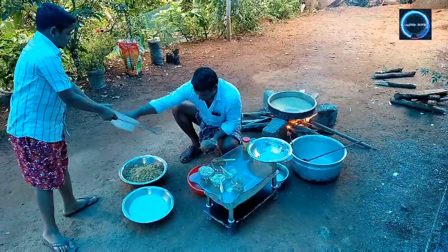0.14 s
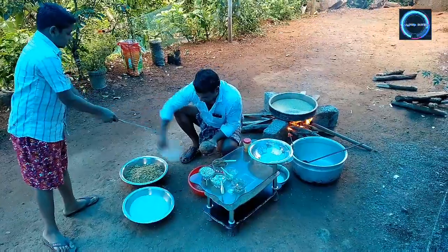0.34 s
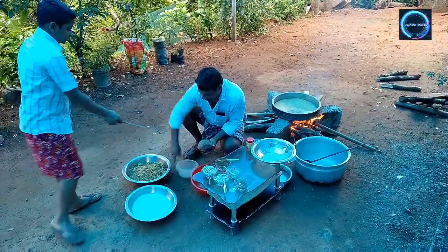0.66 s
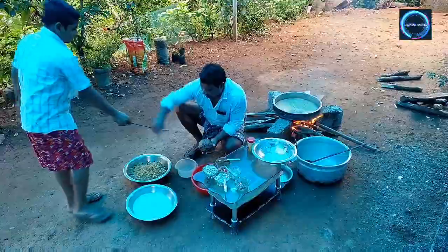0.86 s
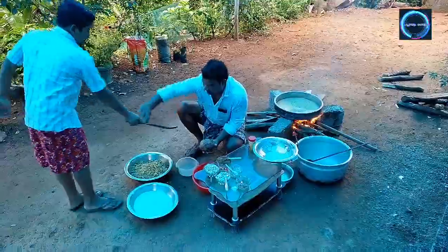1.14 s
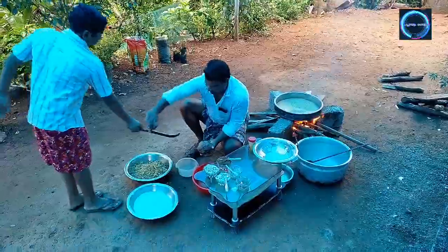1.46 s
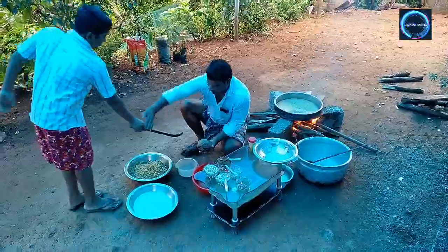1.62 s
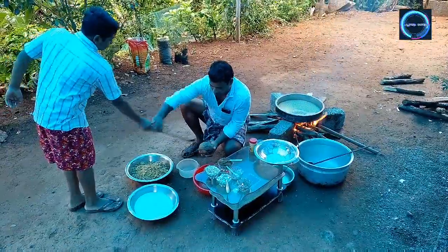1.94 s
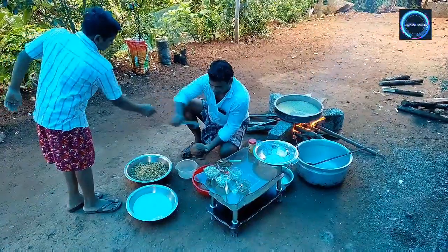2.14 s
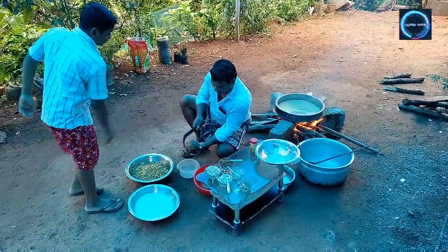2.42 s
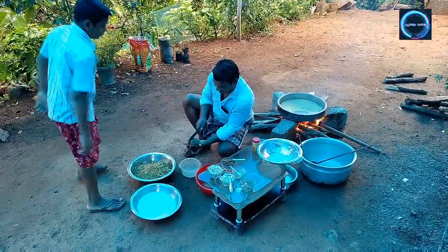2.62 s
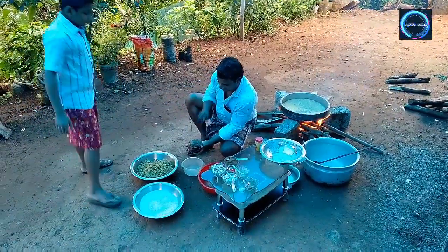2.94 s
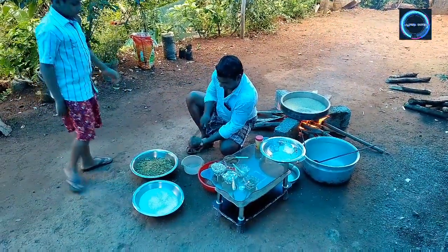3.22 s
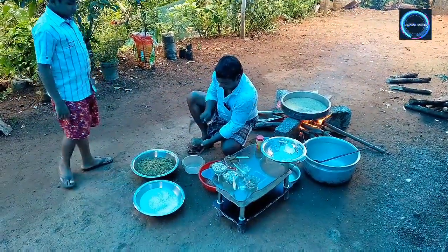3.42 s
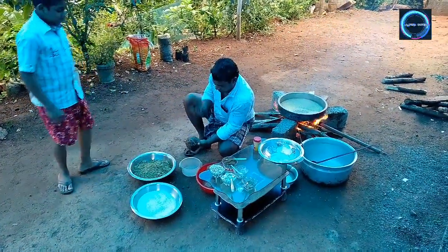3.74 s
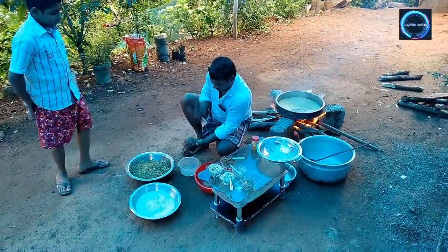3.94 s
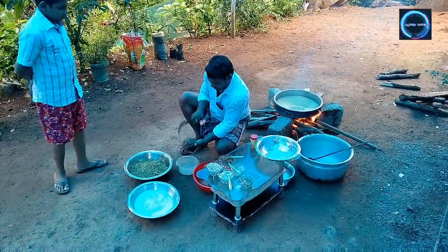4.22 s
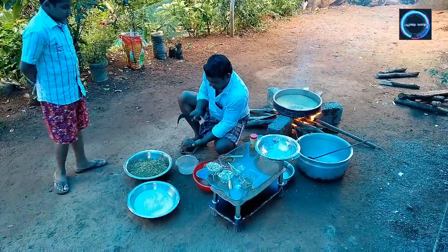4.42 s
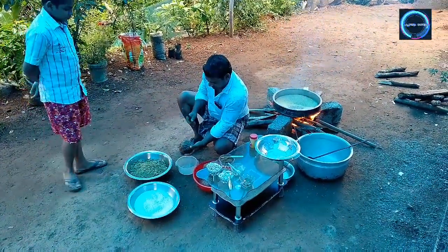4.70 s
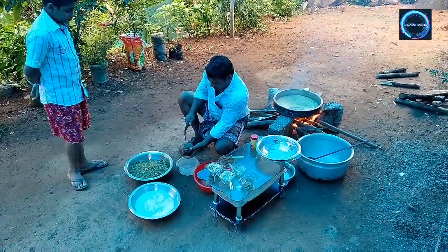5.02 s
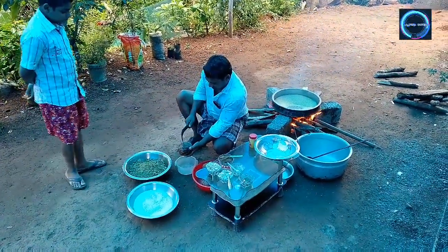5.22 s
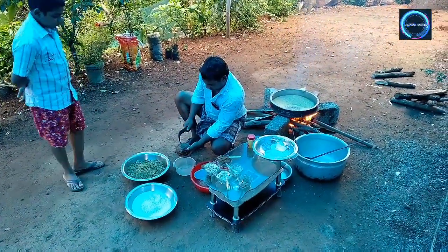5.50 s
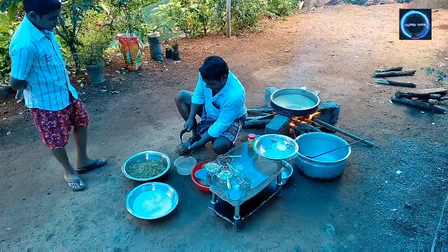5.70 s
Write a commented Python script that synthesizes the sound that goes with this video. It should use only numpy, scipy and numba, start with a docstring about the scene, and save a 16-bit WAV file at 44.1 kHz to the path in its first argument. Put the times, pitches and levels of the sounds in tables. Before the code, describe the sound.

A plastic tub clatters down on an earth yard, then a heavy blade chops a hard coconut shell three times, the last two very loud.

```python
"""A heavy blade chops a hard coconut in an earth yard: a bright crack of the blade, then the knock of the shell.
A plastic tub is set down, things tap, husk and sandals scuff; a fire and garden hiss behind.
Struck things are short pushes into banks of resonances; scuffs and hiss are banded noise.
Walls and trees scatter it all, bar the hiss, into a dense short tail; a phone limits the loud chops."""
import sys
import numpy as np
from scipy import signal
from scipy.io import wavfile
from scipy.ndimage import uniform_filter1d, minimum_filter1d
from numba import njit

SR = 44100
rng = np.random.default_rng(int(sys.argv[2]) if len(sys.argv) > 2 else 0)


def store_wav(level_fs):
    """Save 16-bit WAV to argv[1]."""
    pcm = np.round(np.clip(np.atleast_2d(level_fs), -1, 1) * 32767)
    wavfile.write(sys.argv[1], SR, pcm.T.astype(np.int16))


N = 258426


def undb(db):
    """dB to amplitude."""
    return 10 ** (np.asarray(db) / 20)


def lean(pan_db):
    """Left minus right dB, split evenly over the two channels."""
    return pan_db * np.array([[.5], [-.5]])


def band(x, hz, width_hz):
    """Two-pole resonance, gain 1 at the centre."""
    hz = min(hz, .45 * SR)
    b, a = signal.iirpeak(hz, hz / width_hz, fs=SR)
    return signal.lfilter(b, a, x)


def click():
    """One hard contact: a unit impulse."""
    x = np.zeros(SR // 6)
    x[0] = 1
    return x


def burst(decay_s, rise_s=0.00036):
    """A quarter second that opens with a dying puff of noise."""
    t = np.arange(SR // 4) / SR
    envelope = (1 - np.exp(-t / rise_s)) * np.exp(-t / decay_s)
    return rng.standard_normal(len(t)) * envelope


def ring(push, modes, tilt_db=0., scatter_db=2.0):
    """A push rings the modes in random proportions, tilted in dB/octave from the first; energy is kept."""
    y = 0
    for k, (hz, half_width_hz, db) in enumerate(modes):
        width_hz = 2.0 * half_width_hz
        mode = band(band(push, hz, width_hz), hz, width_hz)
        octaves = np.log2(hz / modes[0][0])
        gain = undb(db + tilt_db * octaves + scatter_db * rng.standard_normal())
        y = y + (-1) ** k * gain * mode / np.linalg.norm(mode)  # neighbours swing in opposite sense
    return y * np.linalg.norm(push) / np.linalg.norm(y)


def detuned(modes, share):
    """Each mode frequency moves at random by this share."""
    return [(hz * (1 + share * rng.standard_normal()), width, db) for hz, width, db in modes]


def add(out, x, s, db, pan_db):
    """Mix one sound into both channels."""
    i = max(int(s * SR), 0)
    out[:, i:i + len(x)] += undb(db + lean(pan_db)) * x[:N - i]


def walk(rate_hz):
    """Random levels held 1 / rate and slewed twice."""
    k = int(SR / rate_hz)
    held = np.repeat(rng.standard_normal(N // k + 1), k)
    return 0.44 * uniform_filter1d(uniform_filter1d(held, k), k)[:N]


ALIKE_HZ = 630  # well below this both ports hear the same
WIND_HZ = 57.7  # below this each port has its own breeze


def pair(n, hz, width_hz):
    """Band noise for two ports, alike in the bass."""
    alike = 1 / (1 + (hz / ALIKE_HZ) ** 2) / (1 + (WIND_HZ / hz) ** 4)
    noise = rng.standard_normal((2, n))
    mid, side = band(band(noise, hz, width_hz), hz, width_hz)
    return np.sqrt(1 + alike) * mid + np.sqrt(1 - alike) * side * np.array([[1], [-1]])


# Fire and garden hiss spectrum: f/Hz, relative level/dB per Hz
HISS = [(18, -60), (30, -99), (58, 7), (122, 7), (231, 0), (306, 0.5), (366, 1), (693, -5), (748, 2),
        (918, -4), (1280, -4), (2080, 0.5), (4000, -4.5), (5000, -20.5), (6300, -7.5), (8910, -6.5),
        (13400, -19.5)]
# Hiss balance: f/Hz, left minus right/dB
HISS_PAN = [(60, 0), (250, 1), (700, -0.5), (2200, 5), (5000, 10), (12000, -0.5)]
HISS_RMS_DB = -50.5  # of the channel mean


def air():
    """Third-octave spaced bands of hiss that swell together and flicker alone."""
    out, swell = 0, walk(2.506)
    (f, level_db), (f_pan, pan_db) = np.transpose(HISS), np.transpose(HISS_PAN)
    for hz in 32 * 2 ** np.arange(0, 8.8, 1 / 3):
        db = np.interp(np.log(hz), np.log(f), level_db) + 5.4 * swell + 2.8 * walk(20)
        band_pan_db = np.interp(np.log(hz), np.log(f_pan), pan_db)
        out = out + undb(db + lean(band_pan_db)) * pair(N, hz, hz / 3)
    return out * undb(HISS_RMS_DB) / np.sqrt(np.mean(out.mean(axis=0) ** 2))


# Scattered tail of the yard: f/Hz, t60/s, level/dB, left minus right/dB
YARD_TAIL = [(56, 0.36, -50.5, 2.5), (249, 0.22, -45.5, 0), (692, 0.26, -45, -0.2),
             (1970, 0.35, -41.5, 2.5), (4900, 0.39, -39.5, 4.5), (9200, 0.32, -36, 0.5)]
YARD_STEADY_S = 0.025  # echoes hold about this long before they fade
YARD_PATCH_DB, YARD_PATCH_HZ = 6, 34.7  # dB per unit of walk, walk rate


def yard(x):
    """Dense echoes: even at first, then dying, each band at its own pace and in its own patches."""
    t, (f, t60s, dbs, pans) = np.arange(SR // 2) / SR, np.transpose(YARD_TAIL)
    late_s = .01 * np.logaddexp(0, (t - YARD_STEADY_S) / .01)  # soft knee
    echo = 0
    for hz in 50 * 2 ** np.arange(0, 8.1, 1 / 3):
        t60, db, pan_db = (np.interp(np.log(hz), np.log(f), v) for v in (t60s, dbs, pans))
        scatter = pair(len(t), hz, hz / 2)
        patches_db = YARD_PATCH_DB * walk(YARD_PATCH_HZ)[:len(t)]
        level_db = db + lean(pan_db) - 60 * late_s / t60 + patches_db
        echo = echo + scatter / scatter.std() * undb(level_db)
    # single walls and trunks stand out, so the echoes come in lumps
    lumps = undb(4.0 * walk(149.0)[:len(t)])
    echo = echo * (1 - np.exp(-t / 0.0013)) * lumps
    return signal.fftconvolve(x, echo, axes=1)[:, :N]


# First single echoes off ground, pots and a wall: delay/s, level/dB, left minus right/dB
FIRST_ECHOES = [(0.0042, -16, 16), (0.0085, -8, -11), (0.016, -10.5, -3), (0.026, -19.5, -10),
                (0.038, -19, -16)]


def early(x):
    """The straight sound and its first separate echoes."""
    out = x.copy()
    for s, db, pan_db in FIRST_ECHOES:
        lag = max(int(s * SR), 1)
        out[:, lag:] += undb(db + lean(pan_db)) * x[:, :-lag]
    return out


# Base level of small handling noises: t/s, level/dB
HANDLING_LEVEL = [(0, -80), (0.3, -59.5), (1.2, -58.5), (1.7, -55), (2.3, -58.5), (3.2, -56.5), (4.55, -68),
                  (4.68, -52), (4.95, -55.5), (5.1, -56), (5.35, -55.5), (5.86, -57.5)]


def handling():
    """Scattered tiny rustles of random pitch and length: puffs through one resonance."""
    out = np.zeros((2, N))
    for at, octave, size, length, side in rng.random((260, 5)):
        s, hz = at * (N - 1) / SR, 1500 * 2 ** (2.8 * octave)
        db = np.interp(s, *np.transpose(HANDLING_LEVEL)) + 6.6 * size
        rustle = ring(burst(0.0038 + 0.02 * length, 0.00055), [(hz, 0.34 * hz, 0)])
        add(out, rustle, s, db, 8.9 * (side - .5))
    return out


# Dull small bumps: t/s, level/dB, f/Hz, left minus right/dB
BUMP_HITS = [(0.272, -52.5, 660, -2), (1.126, -35.5, 507, 3.5), (1.144, -60, 670, -8), (1.717, -49, 256, 2),
             (2.156, -44, 171, -1), (2.946, -37.5, 590, 4.5), (3.069, -53, 545, 4), (3.341, -41.5, 370, 2),
             (3.845, -43.5, 800, 5), (4.621, -49, 196, 0.1), (4.714, -43, 746, -1),
             (4.759, -46.5, 400, 0.1), (4.914, -43, 665, 2), (5.479, -52, 163, 2), (5.69, -46, 127, 0)]
BUMP_DECAY_S, BUMP_RISE_S = 0.015, 0.0011


def bumps():
    """Soft contacts ring one mode and a faint overtone."""
    out = np.zeros((2, N))
    for s, db, hz, pan_db in BUMP_HITS:
        modes = [(hz, 0.3 * hz, 0), (2.5 * hz, hz, -17)]
        add(out, ring(burst(BUMP_DECAY_S, BUMP_RISE_S), modes), s, db, pan_db)
    return out


# Short low thuds on the earth: t/s, level/dB, f/Hz, left minus right/dB
THUD_HITS = [(1.345, -14.5, 307, 0.5), (1.839, -13, 295, 0.5), (5.322, -19, 290, -1)]


def thuds():
    """One blow rings a low mode and two weak overtones."""
    out = np.zeros((2, N))
    for s, db, hz, pan_db in THUD_HITS:
        modes = [(hz, 0.32 * hz, 0), (3.7 * hz, 1.4 * hz, -11), (7.9 * hz, 4.3 * hz, -13)]
        add(out, ring(click(), modes), s, db, pan_db)
    return out


def grains(rows, half_width_share, grit_db):
    """Crackly noise in one band starts fast and dies; grit_db is the mean boost of a grain."""
    out = np.zeros((2, N))
    for s, db, hz, decay_s, pan_db in rows:
        grit = burst(decay_s, rise_s=0.0023) * undb(grit_db * rng.exponential(size=SR // 4))
        add(out, ring(grit, [(hz, half_width_share * hz, 0)]), s, db, pan_db)
    return out


# Scuffs and rustles: t/s, level/dB, f/Hz, decay/s, left minus right/dB
SCUFF_HITS = [(0.0, -40.5, 2420, 0.004, 3), (0.0, -39, 10100, 0.0059, 2), (0.078, -49, 7350, 0.013, 0),
              (1.275, -57, 8000, 0.11, 4), (1.349, -48.5, 4870, 0.011, -3), (1.654, -55, 2130, 0.06, 3.5),
              (1.845, -47.5, 9200, 0.037, 0.5), (1.844, -47, 2260, 0.01, 1), (2.26, -53.5, 5270, 0.01, 12),
              (2.649, -47.5, 9200, 0.025, 6), (3.69, -49, 8800, 0.026, 4), (3.795, -52.5, 11000, 0.024, -4),
              (4.659, -52.5, 8000, 0.3, 0), (4.91, -54.5, 2460, 0.022, 12.5),
              (4.998, -45.5, 6700, 0.0066, -1), (5.135, -46.5, 7600, 0.012, -1),
              (5.322, -52.5, 2880, 0.0086, 11), (5.805, -47, 7760, 0.018, 0)]


def scuffs():
    """Rough rubbing: wide bands of uneven grains."""
    return grains(SCUFF_HITS, half_width_share=0.4, grit_db=3.5)


# Faint pitched rings, among them a high ring of the blade in the first chop: t/s, level/dB, f/Hz, decay/s, left
# minus right/dB
RING_HITS = [(0.817, -25, 2780, 0.0027, 9), (2.773, -28.5, 5870, 0.006, -4), (4.549, -61.5, 780, 0.67, 0),
             (4.712, -44, 2420, 0.028, -4), (5.213, -43, 1730, 0.02, 6)]


def rings():
    """Pitched rings: narrow bands of nearly even grains, so a pitch is heard."""
    return grains(RING_HITS, half_width_share=0.065, grit_db=0.6)


# Tub lands, rocks, settles: t/s, level/dB, hardness/(dB per octave), base boom/dB, rim tick/dB
TUB_LANDINGS = [(0.772, -4.5, 2, -11.5, -25), (0.780, -20, -1, -15.5, -38), (0.822, -4.5, 0.5, -10, -18.5),
                (0.858, -13, 3, -25, -40), (0.896, -34, 7, -41, -45), (0.952, -8.5, 3.5, -17.5, -12),
                (0.958, -21, 8, -24, -29), (1.03, -17, -1.5, -26.5, -45)]
# Modes of tub wall, base and rim, each: f/Hz, half-width/Hz, level/dB
TUB_WALL_MODES = [(720, 80, 7.5), (716, 14, -3.5), (1070, 126, -1), (1580, 150, -2), (2170, 200, -3),
                  (2480, 210, -7), (2730, 140, -6), (3340, 290, -12), (4120, 250, -11), (4620, 340, -23)]
TUB_BASE_MODES = [(223, 69, -3), (412, 53, 0), (552, 99, -5.5)]
TUB_RIM_MODES = [(4500, 570, -8), (5500, 700, -9.5), (6470, 530, -0.5), (8320, 670, -5.5),
                 (10500, 1500, -11)]
TUB_PAN_DB, TUB_DETUNE_SHARE, RIM_DECAY_S = -0.3, 0.02, 0.0023


def tub():
    """Hollow plastic knocks with a boom of the base and a tick of the rim."""
    out = np.zeros((2, N))
    for s, db, hard_db, base_db, rim_db in TUB_LANDINGS:
        wall = detuned(TUB_WALL_MODES, TUB_DETUNE_SHARE)
        add(out, ring(click(), wall, hard_db, scatter_db=2.5), s, db, TUB_PAN_DB)
        add(out, ring(click(), TUB_BASE_MODES), s, base_db, TUB_PAN_DB)
        tick = burst(RIM_DECAY_S)
        add(out, ring(tick / np.linalg.norm(tick), TUB_RIM_MODES), s, rim_db, TUB_PAN_DB)
    return out


# Chops: first touch t/s, touch level/dB, bite level/dB, shell knock level/dB, bite after touch/s,
# shell left minus right/dB, straight path past the crouching body/dB, blade tilt/(dB per octave)
CHOP_BLOWS = [(2.773, -22, -14, 3, 0.00097, 0.5, -11, -10), (3.388, 19, 23, 24, 0.0078, 1.5, -11.5, -8.5),
              (4.157, 20, 25.5, 23.5, 0.007, -0.5, -25, -4)]
# Shell on the ground: f/Hz, half-width/Hz, level/dB in chops 1, 2, 3 by the spot struck
SHELL_MODES = [(119, 290, -35, -26, -24), (210, 120, -19, -21, -14.5), (392, 140, -9, -17, -8.5),
               (604, 78, -21, -25, -6), (813, 123, -4.5, -13.5, -11.5), (1220, 530, -23, -19.5, -8.5),
               (1654, 62, -20, -35, -14.5), (1700, 49, -0.5, -7, -12), (2110, 197, 3, 0.5, -3),
               (2320, 210, -7, -3.5, -3.5), (2700, 200, -4, -8, 0.5), (3177, 490, -4, -3.5, -0.5),
               (4210, 225, -8.5, -5.5, -6.5), (5020, 160, -13, -9.5, -7), (5830, 610, -13.5, -18, -2)]
# Blade: f/Hz, half-width/Hz, level/dB
BLADE_MODES = [(4960, 6800, -3.5), (5630, 470, -5), (6860, 1060, -6), (7760, 130, -3), (8460, 670, -4.5),
               (9973, 590, 2.5), (10400, 370, -1.5), (12440, 920, 2.5)]
TOUCH_SWELL_S, TOUCH_DECAY_S = 0.0021, 0.00067  # edge scrapes in ever louder before it lands
BEND_HZ, BEND_DB = 500., 9  # bass bends round the body, so it comes straight more strongly
# first level against the knock, span, fall over the span
SPLINTER_DB, SPLINTER_S, SPLINTER_FADE_DB = -9.5, 0.07, -13
# spread over the modes; tilt/octave: splinters are thinner than the blow; mode shift per piece
SPLINTER_SCATTER_DB, SPLINTER_TILT_DB, SPLINTER_DETUNE_SHARE = 4, 2, 0.044


def chops():
    """Edge touches, then bites: blade and shell ring, splinters tear off. Returns yard and straight sound."""
    out, straight = np.zeros((2, 2, N))
    t = (np.arange(SR // 10) - SR // 50) / SR
    for k, (s, touch_db, bite_db, knock_db, late_s, pan_db, straight_db, tilt_db) in enumerate(CHOP_BLOWS):
        one, bite_s = np.zeros((2, N)), s + late_s
        shell = [(row[0], row[1], row[2 + k]) for row in SHELL_MODES]
        envelope = np.exp(np.minimum(t / TOUCH_SWELL_S, -t / TOUCH_DECAY_S))
        scrape = rng.standard_normal(len(t)) * envelope
        scrape = scrape / np.linalg.norm(scrape)
        add(one, ring(scrape, BLADE_MODES, tilt_db), s + t[0], touch_db, 0)
        add(one, ring(click(), BLADE_MODES, tilt_db), bite_s, bite_db, 0)
        add(one, ring(click(), shell), bite_s, knock_db, pan_db)
        for wait, size in rng.random((10, 2)):
            modes = detuned(shell, SPLINTER_DETUNE_SHARE)
            piece = ring(click(), modes, SPLINTER_TILT_DB, SPLINTER_SCATTER_DB)
            piece_db = knock_db + SPLINTER_DB + SPLINTER_FADE_DB * wait - 4.9 * size
            add(one, piece, bite_s + SPLINTER_S * wait, piece_db, pan_db)
        bass = signal.lfilter(*signal.butter(1, BEND_HZ, fs=SR), one)
        out = out + one
        straight = straight + undb(straight_db) * (one + undb(BEND_DB) * bass)
    return out, straight


# Send of each source into the yard tail, chops at 0: source name, level/dB
YARD_SEND_DB = {"tub": -2.5, "bumps": -11, "scuffs": -2.5, "rings": -8, "thuds": -8, "handling": -3}


def scene():
    """Straight sound with first echoes, plus yard tail, plus hiss."""
    blows, straight = chops()
    near = {"tub": tub(), "bumps": bumps(), "thuds": thuds(), "handling": handling(),
            "scuffs": scuffs(), "rings": rings()}
    sent = blows + sum(undb(YARD_SEND_DB[name]) * x for name, x in near.items())
    return early(straight + sum(near.values())) + yard(sent) + air()


@njit
def limit(peak, top, ratio, attack, release):
    """Gain that squeezes the followed level above the top by the ratio; rates are per sample."""
    gain, e = np.empty(len(peak)), 0.
    for i in range(len(peak)):
        e += (peak[i] - e) * (attack if peak[i] > e else release)
        gain[i] = min(1., top / (e + 1e-18)) ** (1 - 1 / ratio)
    return gain


LIMIT_DB, LIMIT_RATIO, TOP_HZ = -2, 5.5, 13100


def record(dry):
    """Microphone dulls the highest treble; phone looks ahead, limits, cuts the top and clips."""
    dry = signal.lfilter(*signal.butter(2, 11500., fs=SR), dry)
    peak = -minimum_filter1d(-np.abs(dry).max(axis=0), size=160)  # centred: 80 samples ahead
    held = dry * limit(peak, undb(LIMIT_DB), LIMIT_RATIO, 0.25, 0.0034)
    top_cut = signal.ellip(8, .2, 70, TOP_HZ, fs=SR, output="sos")
    return np.clip(signal.sosfilt(top_cut, held), -1, 1)


dry = scene()
out = record(dry)
store_wav(out)
```